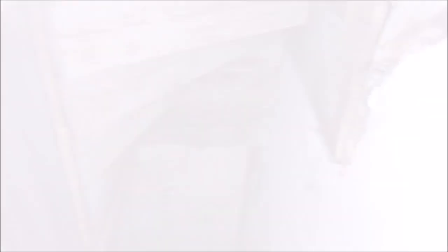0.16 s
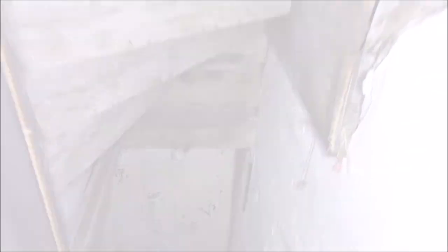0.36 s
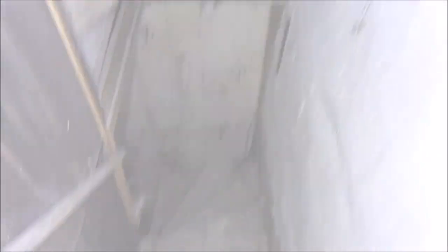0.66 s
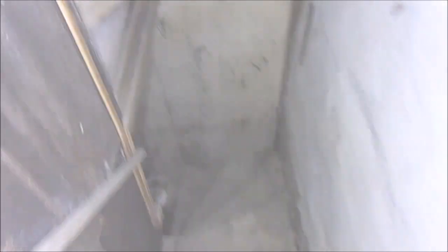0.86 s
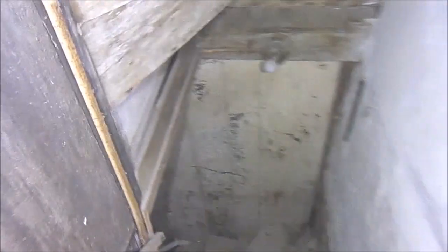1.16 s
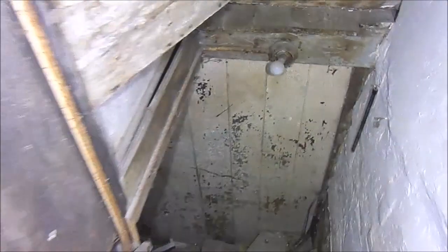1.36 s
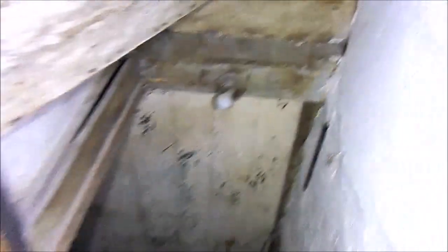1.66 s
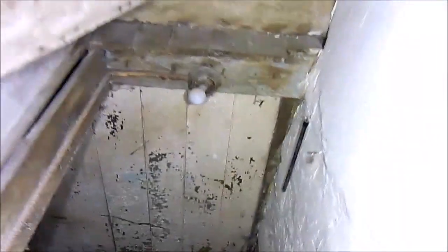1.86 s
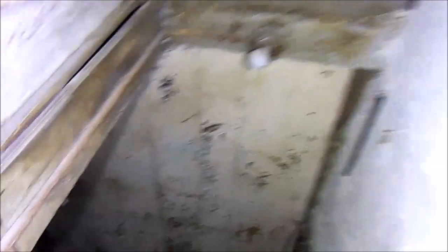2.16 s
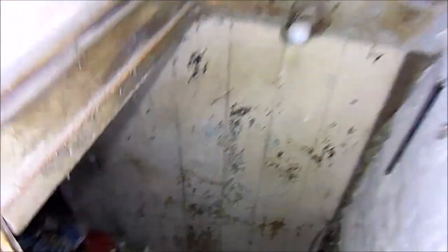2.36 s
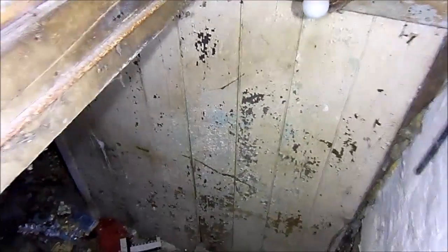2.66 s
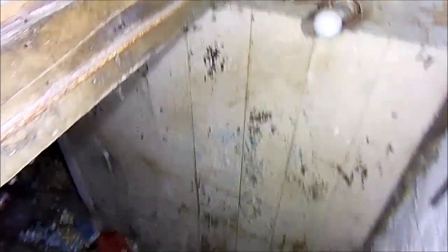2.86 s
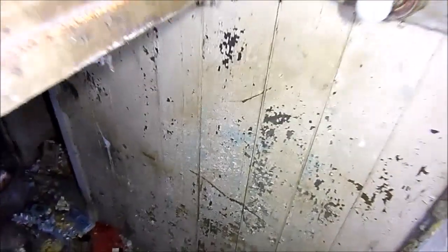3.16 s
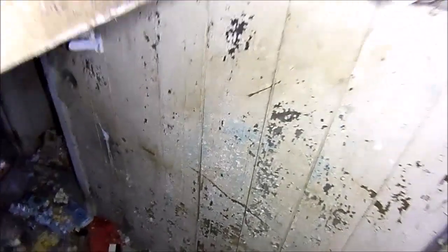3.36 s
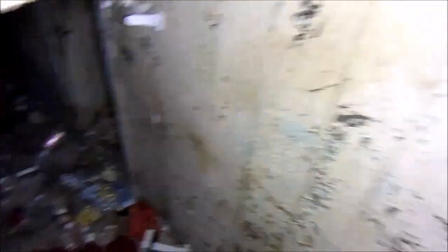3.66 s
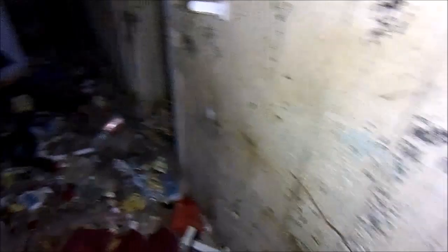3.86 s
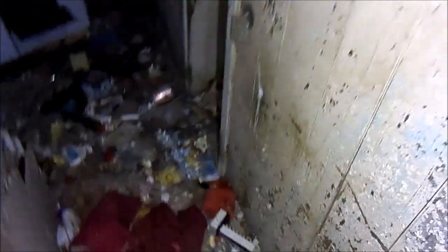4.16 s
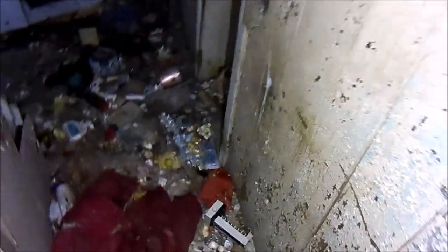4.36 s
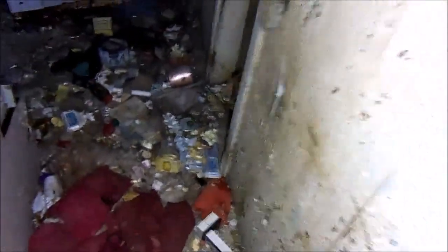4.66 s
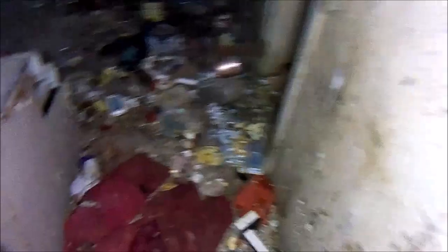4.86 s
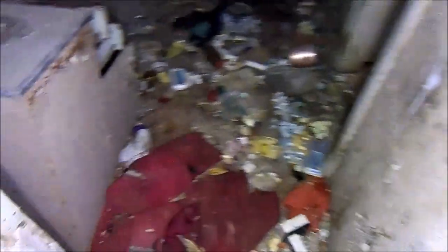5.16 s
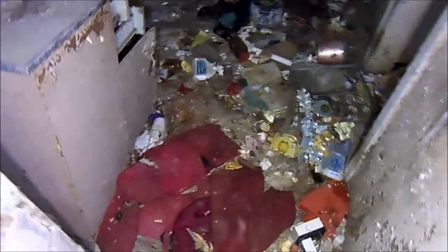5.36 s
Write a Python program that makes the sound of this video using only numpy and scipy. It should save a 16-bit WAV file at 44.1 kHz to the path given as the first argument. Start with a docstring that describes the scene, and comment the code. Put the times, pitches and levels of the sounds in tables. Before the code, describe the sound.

Someone walks carefully down a gritty wooden staircase in an empty house, hollow thuds mixed with scraping soles and snapping crumbs, gradually quietening.

```python
"""A gritty wooden staircase in an empty house: someone walks down it, heard from close by.
Heels and soles thud on the treads as decaying sine modes; each also booms the whole flight, knocks and slaps.
Two layers of grainy noise scuff under the shoes, single crumbs snap as short noise bursts, and a low tone
glides up once. A decaying noise tail answers as the narrow stairwell, over a quiet hiss and rumble."""
import sys
import numpy as np
from scipy import signal
from scipy.fft import rfft, irfft, next_fast_len
from scipy.io import wavfile
from scipy.ndimage import uniform_filter1d, map_coordinates

SR = 44100
rng = np.random.default_rng(int(sys.argv[2]) if len(sys.argv) > 2 else 0)


def file_out(sig):
    """Save sig as 16-bit WAV at sys.argv[1]."""
    # one column per channel
    cols = np.atleast_2d(sig).T
    # limit, then scale
    lim = np.clip(cols, -1, 1)
    pcm = np.round(lim * 32767).astype(np.int16)
    wavfile.write(sys.argv[1], SR, pcm)


N = 242638


def amp(db):
    """Gain of a level in dB."""
    return 10 ** (np.asarray(db) / 20)


def unit(x):
    """x at rms 1."""
    return x / np.sqrt(np.mean(x ** 2) + 1e-20)


def along(points, hz):
    """Read (f/Hz, value) points on a log frequency axis."""
    f, value = np.transpose(points)
    return np.interp(np.log(hz + 1), np.log(f + 1), value)


def curve(points):
    """Join (t/s, value) points by straight lines, one value per sample."""
    t, value = np.transpose(points)
    return np.interp(np.arange(N) / SR, t, value)


def wobble(rate):
    """A smooth random curve, rate knots a second."""
    knots = rng.standard_normal(int(N * rate / SR) + 4)
    return map_coordinates(knots, [np.arange(N) * rate / SR])


def filtered(x, response):
    """Multiply the spectrum of x by a response of frequency."""
    size = next_fast_len(N + 8192)
    hz = np.fft.rfftfreq(size, 1 / SR)
    return irfft(rfft(x, size) * response(hz), size)[..., :N]


def coloured(x, spectrum):
    """Shape x by (f/Hz, level/dB) points, then bring it to rms 1."""
    return unit(filtered(x, lambda hz: amp(along(spectrum, hz))))


def add(track, s, sound):
    """Mix a sound in at s seconds."""
    track[round(s * SR):][:len(sound)] += sound


# colour of the hiss and rumble: [f/Hz, relative level/dB per Hz]
QUIET_COLOUR = [(12, -29), (20, 2.5), (49, -1), (69, -8.5), (104, -5), (310, -12), (468, -14), (706, -18),
                (1400, -24.5), (2700, -31), (6000, -39.5), (10000, -43), (14000, -44)]
QUIET_DB = -60.5


def quiet():
    """Steady hiss and room rumble: shaped noise that swells a little."""
    level = amp(QUIET_DB + 0.33 * wobble(5.1))
    return level * coloured(rng.standard_normal(N), QUIET_COLOUR)


def grit(spectrum, spread_db, clump_db, patchy_db):
    """Dense grains of uneven size that come in clumps, each clump with its own colour, at rms 1."""
    size_db = spread_db * np.minimum(rng.exponential(size=N), 3.2)
    grains = amp(size_db + clump_db * wobble(70)) * rng.standard_normal(N)
    z = signal.stft(grains, nperseg=256)[2]
    # random gains smoothed over neighbouring frequencies, then over time
    patches = uniform_filter1d(rng.standard_normal(z.shape), size=7, axis=0)
    patches = unit(uniform_filter1d(patches, size=5, axis=1))
    patchy = signal.istft(z * amp(patchy_db * patches), nperseg=256)[1][:N]
    return coloured(patchy, spectrum)


# colours of the two grits: [f/Hz, relative level/dB per Hz]
FINE_COLOUR = [(2500, -14), (4500, -7.5), (7000, -6.5), (10300, 0), (14000, -5.5)]
COARSE_COLOUR = [(500, -9), (1000, -3), (1600, 1.5), (3000, 2.5), (4800, 0.5), (7500, -2), (13000, -3.5)]
# faint fine grit between slides: [t/s, level/dB]
RUSTLE_LEVEL = [(0.15, -71.5), (0.45, -65), (0.8, -65.5), (1.1, -65), (2.0, -62), (2.6, -63.5), (3.2, -66),
                (3.7, -68.5), (4.3, -70.5), (5.5, -70)]
RUSTLE_COARSE_DB = -0.5  # coarse over fine, between slides
# a sole sliding over grit: [start t/s, time to crest t/s, length t/s, crest level/dB,
# coarse grit level/dB above the fine]
SOLE_SLIDES = [(0.42, .038, 0.12, -59.5, 1), (0.543, 0.049, 0.071, -47, -5.5),
               (0.575, 0.094, 0.14, -51, -6.5), (0.867, 0.023, 0.056, -50, -7),
               (0.95, 0.013, 0.11, -57.5, -23), (1.128, 0.039, 0.078, -37.5, -8.5),
               (1.185, 0.056, 0.11, -35.5, -6), (1.317, 0.0042, 0.029, -46.5, -12),
               (1.347, 0.04, 0.066, -45.5, -13), (1.468, 0.11, 0.13, -56, -8),
               (1.671, 0.018, 0.012, -46.5, -8), (1.718, 0.085, 0.22, -47.5, -1.5),
               (1.835, 0.034, 0.11, -45, -5), (1.9, 0.031, 0.052, -41.5, -22),
               (1.974, 0.019, 0.031, -49, -5), (2.117, 0.013, 0.065, -55.5, -2),
               (2.327, 0.013, 0.03, -50, -10), (2.388, 0.079, 0.14, -45.5, 3),
               (2.458, 0.013, 0.029, -36.5, -5.5), (2.59, 0.0052, 0.035, -52.5, -7),
               (2.715, 0.016, 0.027, -65, -16), (2.976, .01, 0.034, -56.5, -9),
               (3.223, 0.015, 0.043, -53, -1), (3.309, 0.051, 0.028, -62, 6),
               (3.822, 0.016, 0.054, -43, -4), (3.907, 0.061, 0.13, -62.5, 1.5),
               (4.46, 0.012, 0.038, -60, 6.5), (4.492, 0.014, 0.13, -54.5, -4.5),
               (5.095, 0.027, 0.25, -59.5, -3.5)]
EDGE_DB = 9.5  # how far a slide's ends lie under its crest
PRESS_DB_PER_S, LIFT_DB_PER_S = 900, 490  # slopes outside the slide's start and end


def scuffs():
    """Fine and coarse grit grind under the sole: each slide swells to a crest, eases and lifts off."""
    fine = amp(curve(RUSTLE_LEVEL))
    coarse = amp(RUSTLE_COARSE_DB) * fine
    for s, crest, length, db, coarse_db in SOLE_SLIDES:
        near = slice(round(s * SR) - SR // 10, round((s + length) * SR) + SR // 5)
        t = np.arange(N)[near] / SR - s
        end = max(length, crest + .001)
        shape_db = np.interp(t, [0, crest, end], [-EDGE_DB, 0, -EDGE_DB])
        press_db = -PRESS_DB_PER_S * np.maximum(-t, 0)
        lift_db = -LIFT_DB_PER_S * np.maximum(t - length, 0)
        stroke = amp(db + shape_db + press_db + lift_db)
        # powers add where slides and rustle overlap
        fine[near] = np.hypot(fine[near], stroke)
        coarse[near] = np.hypot(coarse[near], amp(coarse_db) * stroke)
    stick = amp(0.64 * wobble(35))  # the sole sticks and slips
    fine_grit = grit(FINE_COLOUR, spread_db=5.5, clump_db=2.1, patchy_db=1.5)
    coarse_grit = grit(COARSE_COLOUR, spread_db=4.0, clump_db=1.5, patchy_db=2.5)
    return stick * (fine * fine_grit + coarse * coarse_grit)


# crumbs snapping: [t/s, peak level/dB, pitch f/Hz]
CRUMB_SNAPS = [(0.3694, -41.5, 9700), (0.5657, -37, 10900), (1.177, -41, 9550), (1.272, -28, 9000),
               (1.3207, -48, 9900), (1.668, -36.5, 4820), (1.9342, -26, 9500), (2.0507, -39, 10100),
               (2.334, -42, 10030), (2.3378, -42, 10500), (2.3893, -39, 10500), (2.4374, -28, 10000),
               (2.4422, -29, 10000), (2.463, -32, 8000), (2.4925, -39, 2800), (2.591, -47, 12600),
               (2.6315, -43, 9430), (2.7228, -43.5, 5600), (2.805, -46.5, 5230), (3.4615, -44, 9800),
               (3.495, -43, 10200), (3.5557, -44.5, 10800), (3.837, -36, 9000), (4.1112, -43.5, 6000),
               (4.382, -45, 9000), (4.4553, -49, 8090), (4.468, -36, 6950), (4.9223, -41.5, 5230)]


def snaps():
    """A crumb breaks: a noise burst of a few milliseconds, broad around its pitch."""
    out, t = np.zeros(N + SR), np.arange(SR // 40) / SR
    for s, db, hz in CRUMB_SNAPS:
        edges = [0.81 * hz, min(1.45 * hz, SR * .45)]
        band = signal.butter(1, edges, "band", fs=SR, output="sos")
        noise = rng.standard_normal(len(t)) * amp(-60 * t / 0.011)
        burst = signal.sosfilt(band, noise)
        add(out, s, amp(db) * burst / np.abs(burst).max())
    return out[:N]


# modes of the treads before each step retunes them: [f/Hz, relative level/dB, t60 t/s]
TREAD_MODES = [(204.4, -1, 0.13), (253.7, 0.5, 0.085), (309, 1.5, 0.081), (367, 2, 0.069),
               (411, 0.5, 0.081), (480, -4.5, 0.16), (590, 9.5, 0.016), (721, 9.5, 0.024), (896, 8, 0.017),
               (1044, 8, 0.014), (1260, 2, 0.021), (1469, 5, 0.04), (1790, -11.5, 0.044), (2200, -3, 0.02),
               (2800, -4, 0.019)]
KNOCK_HZ = 500  # modes below make the thud, those above the woody knock


def ring_modes(part, ring_hz, slope_db, sharp_db, chance, t):
    """Sum a part's decaying sine modes, louder near the favoured ring; slope and sharpness per octave."""
    hz, level_db, t60 = np.transpose(TREAD_MODES)[:, part, None]
    nearest = hz[np.argmin(np.abs(np.log(hz / ring_hz)))]
    tuned = hz * ring_hz / nearest  # the nearest mode moves onto the ring, the others follow
    place_db = -slope_db * np.abs(np.log2(tuned / ring_hz))
    tilt_db = sharp_db * np.log2(np.maximum(tuned / KNOCK_HZ, 1))
    gain = amp(level_db + place_db + tilt_db + 2 * chance[part] - 60 * t / t60)
    return (gain * np.sin(2 * np.pi * tuned * t)).sum(0)


# modes of the whole flight: [f/Hz, relative level/dB, t60 t/s]
FLIGHT_MODES = [(62, 0, 0.6), (117.3, -11, 0.35)]


def flight_boom(t):
    """The whole flight sways in a few low decaying modes with a soft onset."""
    sway = sum(amp(db - 60 * t / t60) * np.sin(2 * np.pi * hz * t) for hz, db, t60 in FLIGHT_MODES)
    return sway * (1 - np.exp(-t / 0.0046))


# footfalls: [t/s, overall level/dB, then inside it boom level/dB, knock level/dB, slap level/dB,
# ring of the thud f/Hz, ring of the knock f/Hz]
FOOTFALLS = [(0.385, -38.5, -6, -7.5, -22, 238, 580), (0.425, -45, 5, 3, -8, 196, 1160),
             (0.569, -49.5, -9, 3.5, 4, 242, 1410), (0.671, -57, 2, 7, -3, 171, 696),
             (1.098, -35.5, 2.5, 1, -8, 267, 622), (1.112, -46, -20, 7.5, -17, 301, 695),
             (1.285, -44.5, -20, 2.5, -15, 265, 660), (1.57, -64, -4, 12, -23, 435, 650),
             (1.678, -29.5, -4, -7.5, -18.5, 240, 757), (1.793, -34.5, -26, 7.5, 2.5, 304, 613),
             (2.047, -58.5, -13, 6, 2, 160, 1020), (2.067, -57.5, -5, 10.5, 3, 203, 1100),
             (2.312, -52, 12, 5, -28, 473, 1150), (2.526, -55, 5.5, 9, -1, 221, 812),
             (2.802, -65, -7, 9, -20, 447, 630), (2.973, -58.5, -4, -2, 7.5, 293, 1200),
             (3.0711, -31.5, -13, -9, -28, 199.6, 605), (3.177, -56, 7, 12.5, 2, 252, 1240),
             (3.233, -57.5, -7, 10.5, 1, 182, 690), (3.246, -52, -20, 7, 5, 227, 1066),
             (3.7506, -40.5, -9.5, 1.5, -20, 202.5, 770), (3.853, -50, 0.5, 8.5, 4.5, 195, 793),
             (3.955, -54, 0.5, -2.5, -10, 381, 690), (4.386, -44.5, -26, -5, -17, 180, 690),
             (4.454, -62, -13, -17, 10.5, 186, 1500), (4.511, -59, -2, 7, 13, 168, 1050),
             (4.526, -42, -25, 2.5, -14, 281, 900), (4.952, -60.5, -21, 8.5, -17, 300, 801)]
THUD_DB_PER_OCT, KNOCK_DB_PER_OCT = 19, 5.5  # how fast modes fall away from the favoured ring
TILT_DB = 0.47  # per octave and dB of slap over knock: a sharper contact reaches the higher modes


def steps():
    """Each footfall rings the tread's modes around its favoured pitches, booms the flight and slaps."""
    out, t = np.zeros(N + SR), np.arange(SR * 3 // 4) / SR
    low = np.transpose(TREAD_MODES)[0] < KNOCK_HZ
    slap_band = signal.butter(1, [800, 3000], "band", fs=SR, output="sos")
    for s, db, boom_db, knock_db, slap_db, thud_hz, knock_hz in FOOTFALLS:
        chance = rng.standard_normal((len(TREAD_MODES), 1))
        rattle_noise, slap_noise = rng.standard_normal((2, len(t)))
        sharp_db = TILT_DB * (slap_db - knock_db + 14.5)

        thud = ring_modes(low, thud_hz, THUD_DB_PER_OCT, sharp_db, chance, t)
        thud = thud * (1 - np.exp(-t / 0.0024))

        # grit under the heel breaks the blow into many small ones
        rattle = rattle_noise * amp(-60 * t / 0.033) * (1 - np.exp(-t / 0.0027))
        wood = ring_modes(~low, knock_hz, KNOCK_DB_PER_OCT, sharp_db, chance, t)
        knock = signal.fftconvolve(wood, rattle)[:len(t)]
        knock = amp(knock_db) * knock / np.abs(knock).max()

        boom = amp(boom_db) * flight_boom(t)
        slap_shape = amp(slap_db - 60 * t / 0.049) * (1 - np.exp(-t / 0.0011))
        slap = slap_shape * unit(signal.sosfilt(slap_band, slap_noise))
        add(out, s, amp(db) * (thud + knock + boom + slap))
    return out[:N]


# the stairwell's decay: [f/Hz, t60 t/s]
WELL_DECAY = [(100, 0.41), (250, 0.15), (500, 0.22), (2000, 0.074), (10000, 0.019)]


def stairwell(x):
    """The walls answer with a noise tail in which each frequency dies at its own speed."""
    hz, t, z = signal.stft(rng.standard_normal(SR // 2), SR, nperseg=256)
    decay = amp(-60 * t / along(WELL_DECAY, hz)[:, None])
    tail = signal.istft(z * decay, SR, nperseg=256)[1]
    late = np.pad(x, (150, 0))  # samples of delay before the answer
    return signal.fftconvolve(late, tail / np.linalg.norm(tail))[:N]


# a low tone slides up as a foot leaves its tread: [start t/s, length t/s, from f/Hz, to f/Hz, level/dB]
LIFT_TONE = (1.268, .068, 80, 140, -41)


def glide():
    """A short low sine that swells and fades while its pitch rises."""
    out = np.zeros(N)
    s, length, from_hz, to_hz, db = LIFT_TONE
    u = np.arange(round(length * SR)) / (length * SR)  # progress from 0 to 1
    phase = 2 * np.pi * np.cumsum(from_hz + (to_hz - from_hz) * u) / SR
    add(out, s, amp(db) * np.sin(np.pi * u ** 1.3) * np.sin(phase))
    return out


def scene():
    """Feet, grit and walls over the quiet; the walls' answer is thinned in the bass, so the booms stay clear."""
    feet = steps() + glide() + snaps()
    walls = filtered(stairwell(feet), lambda hz: hz ** 2 / (hz ** 2 + 220 ** 2))
    return (feet + amp(-6) * walls + scuffs() + quiet())[None]


# the fade-in: [t/s, level/dB]
FADE_IN = [(0, -68), (.095, -44), (.108, 1)]
# the top treble drops by a shelf: [corner f/Hz, level/dB above it]
TREBLE_SHELF = (14080, -56)
TOP_HZ = 15127  # nothing is kept from here up


def record(dry):
    """The sound fades in; a shelf drops the top treble and a band limit ends it."""
    shelf_hz, shelf_db = TREBLE_SHELF
    faded = dry * amp(curve(FADE_IN))
    return filtered(faded, lambda hz: np.where(hz < shelf_hz, 1, amp(shelf_db)) * (hz < TOP_HZ))


dry = scene()
out = record(dry)
file_out(out)
```